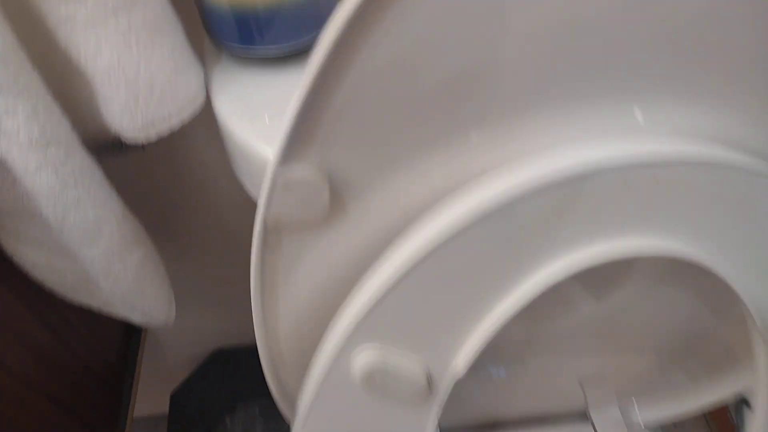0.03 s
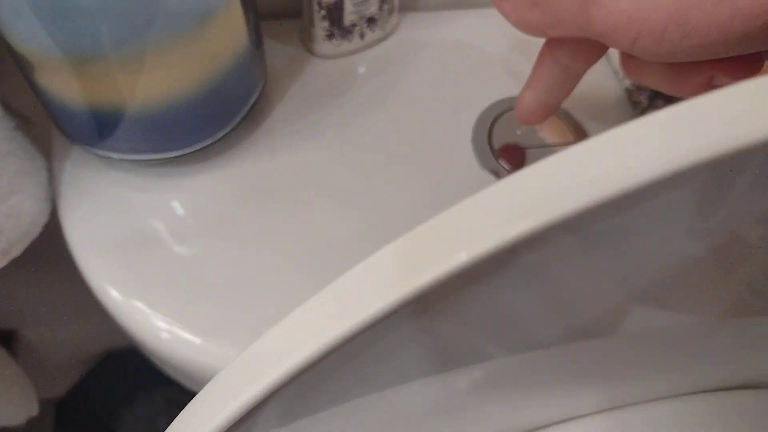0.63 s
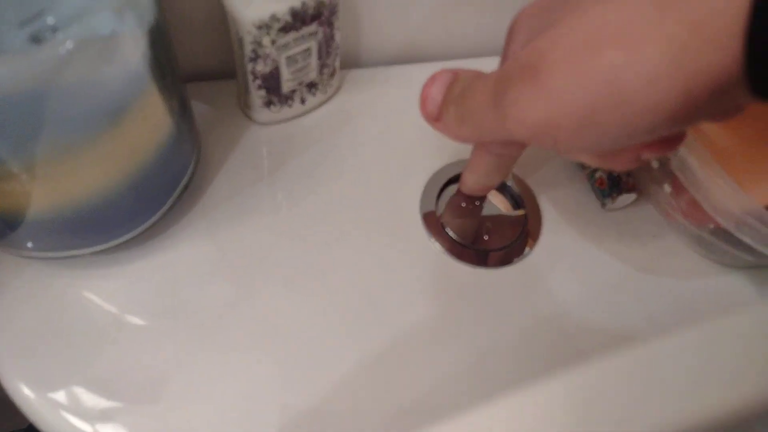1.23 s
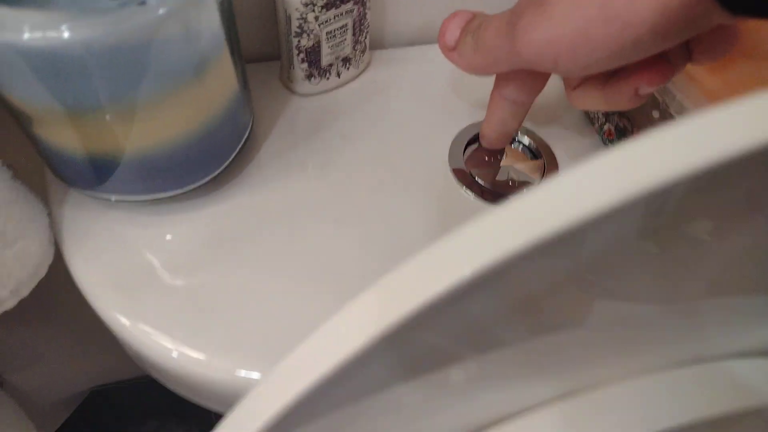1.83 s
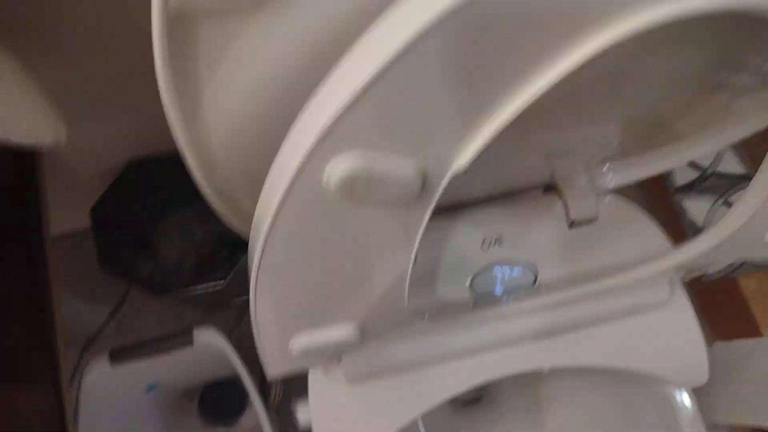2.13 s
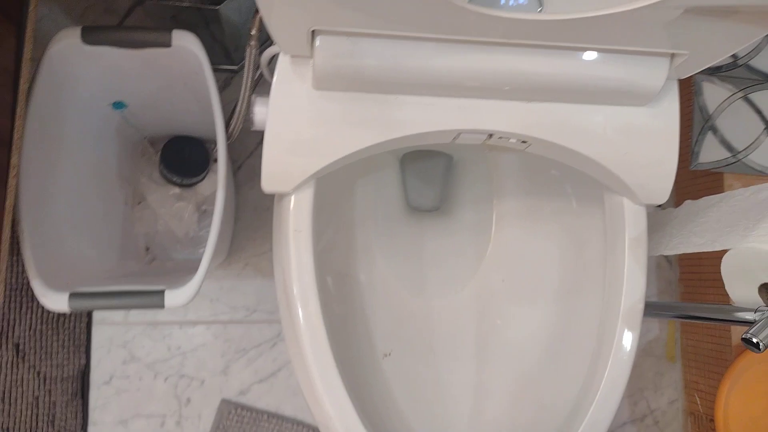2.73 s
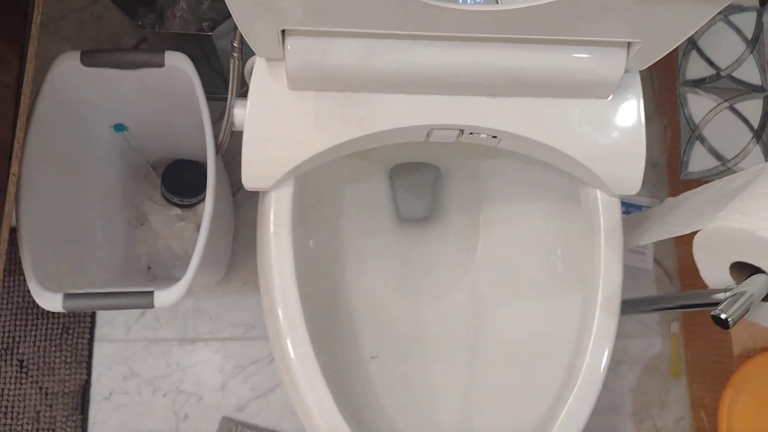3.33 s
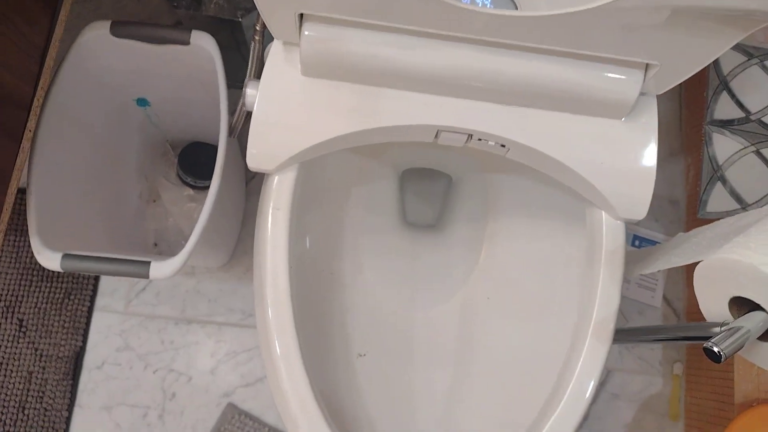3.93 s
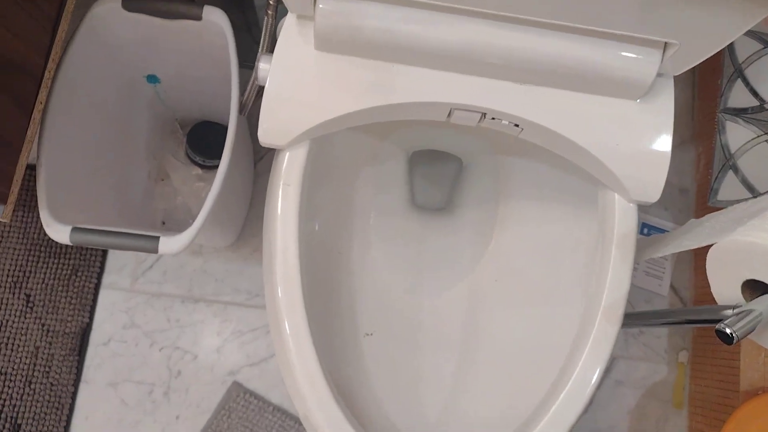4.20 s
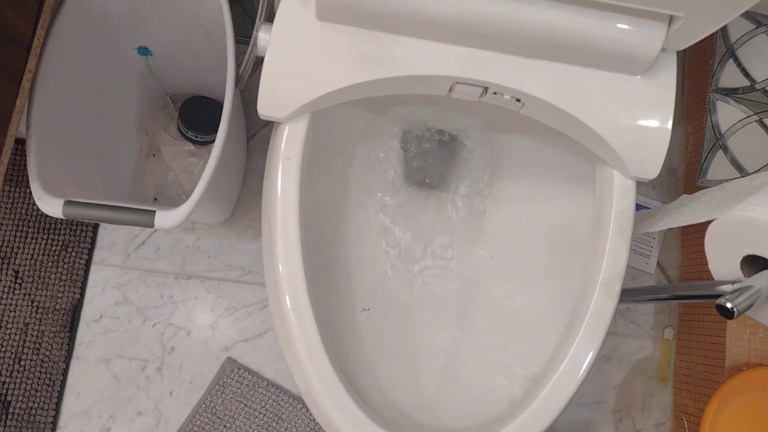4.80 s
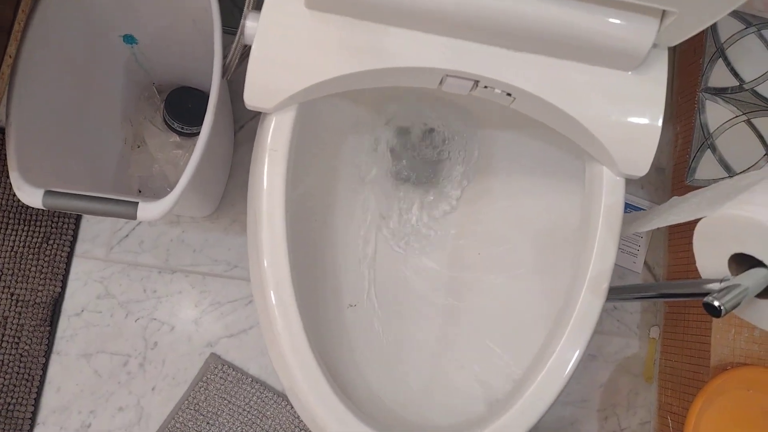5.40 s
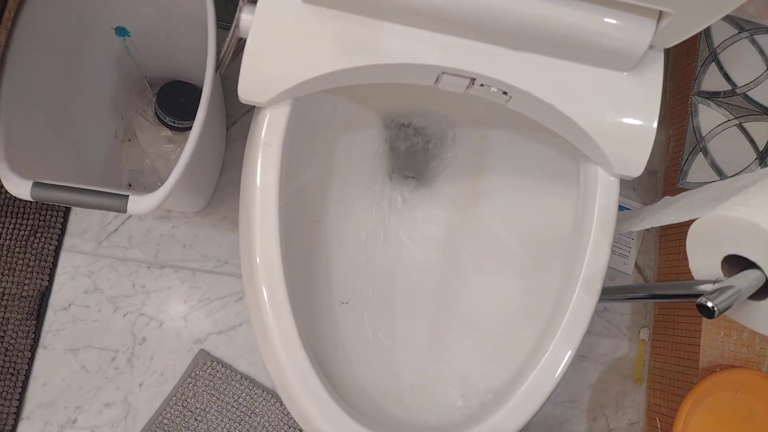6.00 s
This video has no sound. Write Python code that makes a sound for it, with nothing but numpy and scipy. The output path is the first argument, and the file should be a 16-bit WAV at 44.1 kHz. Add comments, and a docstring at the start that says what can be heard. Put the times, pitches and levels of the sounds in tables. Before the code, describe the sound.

A low, steady drone fills a small tiled bathroom. A hand rubs about softly and presses a toilet's flush button with a few faint clicks. After a quiet pause, a jet of water hisses up and the toilet flushes loudly, with deep glugs in the drain, churning bubbles and spray spattering the porcelain bowl. The microphone is close, and the tiles add a short reverberation.

```python
"""A small tiled bathroom, in which a toilet is flushed. Over the low drone of the room's standing
waves a hand rubs about and clicks the button. After a pause the jet hisses up and drives air through
the trap. Each bubble rings as an oscillator, the larger the lower: big ones glug in the trap, smaller
ones churn and plop in the bowl, and spray spatters the porcelain as the water surges again.
The air modes of the bowl and the reverberation of the tiles colour the water's sound."""
import sys
import numpy as np
from scipy import signal
from scipy.fft import rfft, irfft, next_fast_len
from scipy.io import wavfile
from scipy.ndimage import uniform_filter1d, map_coordinates

SR = 44100
rng = np.random.default_rng(int(sys.argv[2]) if len(sys.argv) > 2 else 0)


def store_pcm(level_fs):
    """Save levels as 16-bit WAV."""
    pcm = np.round(np.clip(level_fs, -1, 1) * 32767).astype(np.int16)
    wavfile.write(sys.argv[1], SR, np.atleast_2d(pcm).T)


N = 271215
FLUSH_S, TOP_HZ = 4.1, 15850  # onset of the stream; upper limit of the sound

# Noise spectra of the room and the jet. Each row: frequency in Hz, relative density in dB.
DRONE_SPECTRUM = [(15, -63), (25, -38), (38, -18), (64, -17.5), (73, -23), (86, -9.5), (136, -7),
                  (168, -5.5), (183, 1), (200, -16), (227, -4.5), (281, -5.5), (500, -22.5), (650, -40),
                  (1100, -120)]
AIR_SPECTRUM = [(240, -79), (400, -2.5), (513, -7), (568, 2.5), (738, -1.5), (835, 0.5), (1080, -5.5),
                (1540, -6), (1810, -9.5), (2160, -10), (6000, -38.5), (7800, -36), (13200, -120)]
SLEEVE_SPECTRUM = [(1760, -21), (3000, -10), (3360, -19.5), (3620, -12.5), (15100, -30), (16000, -37)]
HISS_SPECTRUM = [(210, -37), (350, 6.5), (530, 9.5), (707, 7.5), (871, 5), (943, 2), (1160, 7), (1500, 3.5),
                 (1730, 0), (2240, -10), (2420, -13), (3450, -45), (4700, -36), (6000, -15), (13400, -29),
                 (16000, -28)]
SIZZLE_SPECTRUM = [(4000, -40), (7000, -9), (10000, -4.5), (13000, 1), (15000, -6), (16000, -4)]
# Spectra of five bubble sizes, largest first. Each row: frequency in Hz, relative density in dB.
GURGLE_SPECTRUM = [(29, -63), (50, -40), (75, -14), (95, -4), (112, -7), (145, -3), (175, -4), (205, 2),
                   (245, 0), (290, -4), (308, -8), (337, 0.5), (385, -5), (420, -2), (476, -8), (600, -30),
                   (1100, -120)]
BURBLE_SPECTRUM = [(280, -60), (430, -24), (500, 4.5), (595, 3.5), (640, 6), (720, 1), (800, -7),
                   (1300, -87)]
SLOSH_SPECTRUM = [(440, -15), (800, -13), (969, 5.5), (1100, 3.5), (1300, 4.5), (1500, -11), (1740, -8),
                  (1900, -3), (2470, -34), (4180, -120)]
CHURN_SPECTRUM = [(940, -21), (1450, 3.5), (1610, 1.5), (1740, -15), (2100, -0.5), (2480, -2.5),
                  (2850, -1.5), (3210, -3), (3550, -8), (4100, -8.5), (4650, -15.5), (5500, -33),
                  (7150, -44.5), (12100, -120)]
SPRAY_SPECTRUM = [(2240, -36), (3800, -1), (4660, -6.5), (5550, -7), (6500, -4.5), (8200, -6), (10500, -11),
                  (13700, -13.5), (15200, -15), (16000, -30)]
# Modes of room, water channels and bowl. Each row: frequency in Hz, bandwidth in Hz, gain in dB.
ROOM_MODES = [(97, 5.3, -3), (173.8, 7.5, 4.5), (245.4, 8, 2.5), (289, 3.4, -14), (332.3, 4.2, 3)]
CHANNEL_MODES = [(877, 24, 3), (1150, 48, -4), (1450, 60, -3), (1590, 25, 1), (1910, 43, -1), (2250, 70, 5),
                 (2440, 29, -5), (2690, 50, -1), (3040, 51, -7), (4000, 130, -11), (5750, 43, -21),
                 (6100, 50, -20), (6300, 50, -18), (6620, 44, -16), (7540, 39, -23)]
BOWL_MODES = [(95, 7, -2), (223, 61, -0.5), (337, 24, -3), (420, 16, 3), (591, 14, 7), (636, 20, 5),
              (675, 30, 2), (953, 22, 11), (1068, 36, 3), (1298, 26, 3), (1476, 20, 13), (1609, 32, 8),
              (1820, 26, 10), (2057, 36, 11), (2170, 48, 10), (2413, 22, 13.5), (2745, 26, 7),
              (3250, 70, -3)]
# Coherence of the room tone and near the bowl. Each row: frequency in Hz, left-right correlation.
ROOM_COHERENCE = [(40, 0.54), (130, 1), (290, 0.76), (640, 0.22), (1410, 0.067), (3100, 0)]
BOWL_COHERENCE = [(40, 0.81), (110, 0.99), (270, 0.98), (400, 0.87), (750, 0.39), (1200, 0.54),
                  (2300, 0.54), (4000, -0.38), (7000, -0.38), (15000, -0.48)]
# Reverberation of the tiles. Each row: frequency in Hz, time to fall 60 dB in seconds.
TILE_DECAY = [(150, 0.44), (1000, 0.19), (4000, 0.085), (14000, 0.071)]
# Stereo balance of the toilet. Each row: frequency in Hz, left minus right in dB.
TOILET_BALANCE = [(200, -0.5), (380, -4), (700, -1), (1290, 0), (2380, 0), (4400, -1), (15000, -1)]
# Steady room tones. Each row: frequency in Hz, level by the cistern in dB, level over the bowl in dB.
HUM_TONES = [(96.9, -61, -59), (166.9, -52, -53), (285.3, -50, -62), (323.0, -58, -54.5), (565.2, -65, -68),
             (668, -66, -76), (826, -68, -72), (855.9, -66, -68), (1295, -75, -77), (1561, -71, -73)]
# The listener's path. Each row: time in seconds, position from 0 (cistern) to 1 (bowl).
LISTENER_PATH = [(0, 0.89), (0.35, 0.046), (2.1, 0), (2.6, 0.43)]
# Envelopes of drone, jet, escaping air and stream. Each row: time in seconds, relative level in dB.
DRONE_LEVELS = [(0.0, -54), (0.19, -57.5), (0.3, -52.5), (1.0, -52), (1.25, -51), (1.85, -55), (2.15, -52),
                (2.55, -59), (2.9, -55), (3.1, -56), (3.8, -57)]
JET_LEVELS = [(3.7, -98), (3.83, -53), (3.9, -53), (4.0, -44.5), (4.08, -41.5), (4.16, -38), (4.4, -41),
              (4.75, -39), (6.15, -45.5)]
SIZZLE_LEVELS = [(3.78, -75), (3.92, -71), (4.08, -57), (4.12, -52.5), (4.28, -46), (4.55, -67),
                 (4.62, -75), (4.8, -83)]
FLOW_LEVELS = [(4.1, -7), (4.25, 5), (4.5, 4.5), (4.76, -0.5), (5.0, 1), (5.3, 0.5), (5.75, 0.5), (5.94, 4),
               (6.15, 6)]
# Rubs of the hand. Each row: start and length in seconds, crest level in dB, centre and width in Hz.
HAND_SCUFFS = [(0, 0.42, -55, 654, 170), (0, 0.43, -53.5, 956, 220), (0.098, 0.24, -62, 1570, 260),
               (0.972, 0.052, -67, 8950, 7000), (0.874, 0.085, -66, 1980, 1100),
               (1.079, 0.31, -60, 1590, 1290), (1.527, 0.11, -47, 270, 199),
               (2.059, 0.11, -66.5, 3500, 5000), (2.82, 0.16, -45, 167, 22), (3.154, 0.14, -48.5, 102, 40),
               (3.246, 0.27, -54.5, 676, 1390), (3.334, 0.062, -59.5, 2500, 3200)]
# Button clicks, single surface bubbles, and spray striking porcelain.
# Each row: start in seconds, relative peak level in dB, frequency in Hz.
BUTTON_TICKS = [(0.878, -52, 2200), (0.8925, -57, 4600), (0.8935, -48.5, 2100), (0.9345, -52, 2500),
                (2.3265, -52, 3000), (2.3275, -54, 5500)]
SURFACE_PLOPS = [(3.835, -50, 2280), (3.86, -44, 3260), (3.94, -51, 2420), (4.0155, -25, 2230),
                 (4.18, -41, 4000), (4.2299, -21, 994), (4.3343, -18.5, 2240), (4.352, -19.5, 972),
                 (4.3936, -13, 2240), (4.5003, -17, 2270), (4.52, -15.5, 3000), (4.6146, -25, 1430),
                 (4.7395, -25, 2240), (4.8142, -18, 2860), (4.8271, -18, 1620), (4.832, -16, 2350),
                 (4.9802, -17, 2060), (5.0288, -11.5, 2370), (5.04, -12.5, 1450), (5.0572, -4.5, 2240),
                 (5.059, -19, 2690), (5.091, -7, 2087), (5.13, -15, 2130), (5.1704, -16, 1420),
                 (5.1932, -9.5, 2110), (5.195, -13, 3540), (5.222, -13, 1514), (5.3232, -21.5, 1600),
                 (5.4095, -20, 2430), (5.4242, -15, 2115), (5.4602, -14.5, 2245), (5.5031, -23.5, 2210),
                 (5.5189, -16.5, 1077), (5.561, -24, 1880), (5.6225, -24, 2150), (5.855, -34, 2270),
                 (5.8872, -16.5, 1246), (5.908, -11.5, 2120), (5.9596, -17, 3140), (6.0164, -15.5, 2330),
                 (6.0509, -12, 1990), (6.097, -12.5, 1037)]
SPRAY_DROPS = [(4.2734, -31.5, 7850), (4.3373, -29, 9400), (4.362, -23, 6200), (4.4508, -25, 8400),
               (4.4795, -26, 6800), (4.5595, -23, 6600), (4.63, -34.5, 7800), (4.6852, -31, 3720),
               (4.8282, -36, 6470), (4.9953, -32.5, 9700), (5.052, -23.5, 4270), (5.1257, -27.5, 7100),
               (5.2492, -40, 9600), (5.3106, -36, 8280), (5.4622, -34, 6200), (5.5246, -33, 6830),
               (5.544, -31, 11700), (5.584, -32, 6300), (5.602, -29, 10100), (5.686, -36.5, 9050),
               (5.8075, -29, 10600), (5.915, -38, 10300), (6.0737, -20.5, 5040)]
# Air pockets leaving the trap.
# Each row: start in seconds, relative level in dB, frequency in Hz, time to fall 60 dB in seconds.
AIR_POCKETS = [(4.177, -12, 252, 0.066), (4.2268, -2.5, 246, 0.054), (4.233, -8, 341.6, 0.092),
               (4.272, -8, 291, 0.085), (4.285, -20, 643, 0.097), (4.289, -11, 266, 0.091),
               (4.303, -11, 333.2, 0.23), (4.367, -25, 313, 0.13), (4.392, -15, 228, 0.097),
               (4.439, -16, 316, 0.073), (4.441, -17, 612, 0.053), (4.502, -15.5, 261, 0.12),
               (4.553, -13.5, 247, 0.08), (4.65, -15, 253, 0.083), (4.823, -14.5, 235.4, 0.098),
               (4.854, -11, 243, 0.071), (4.883, -12.5, 236, 0.07), (4.945, -30, 602, 0.098),
               (5.648, -19.5, 308, 0.068), (5.675, -19, 251, 0.17), (5.741, -16.5, 221, 0.14),
               (5.884, -14, 218, 0.075)]
# Surges of air and water.
# Each row: start, attack and length in seconds, then levels of gurgle, churn and spray in dB.
WATER_SURGES = [(4.08, 0.011, 0.14, -47, -56, -68), (4.223, 0.0016, 0.074, -25.5, -36.5, -44.5),
                (4.317, 0.012, 0.23, -36, -32.5, -41), (4.603, 0.008, 0.036, -43, -31.5, -50),
                (4.803, 0.022, 0.051, -26, -27.5, -41), (4.916, 0.094, 0.095, -33.5, -31, -43.5),
                (5.03, 0.0078, 0.11, -57, -31, -42.5), (5.174, 0.013, 0.067, -38.5, -29, -48),
                (5.258, 0.01, 0.14, -42, -53, -47), (5.405, 0.006, 0.087, -35.5, -43, -45.5),
                (5.498, 0.012, 0.097, -32, -44, -45.5), (5.634, 0.006, 0.11, -32, -47, -55),
                (5.795, 0.0045, 0.013, -53, -43.5, -44.5), (5.87, 0.018, 0.012, -45, -35, -44.5),
                (5.961, 0.053, 0.22, -55, -32.5, -42.5), (6.039, 0.052, 0.13, -52, -31.5, -36.5)]


def amp(db):
    """Amplitude ratio for a level in decibels."""
    return 10 ** (np.asarray(db) / 20)


def unit(x):
    """Normalisation to rms 1."""
    return x / np.sqrt(np.mean(x ** 2) + 1e-20)


def along(points, hz):
    """Interpolation of (Hz, value) points on a logarithmic frequency axis."""
    freqs, values = np.transpose(points)
    return np.interp(np.log(hz + 1), np.log(freqs + 1), values)


def curve(points, before=None):
    """Linear interpolation of (seconds, value) points at every sample."""
    times, values = np.transpose(points)
    return np.interp(np.arange(N) / SR, times, values, left=before)


def wobble(rate):
    """Smooth random modulation: a spline through `rate` Gaussian knots a second."""
    knots = rng.standard_normal(int(N * rate / SR) + 4)
    return map_coordinates(knots, [np.arange(N) * rate / SR])


def filtered(x, response):
    """Linear filtering: the spectrum of x is multiplied by a frequency response."""
    size = x.shape[-1]
    padded = next_fast_len(size + SR // 10, real=True)
    return irfft(rfft(x, padded) * response(np.fft.rfftfreq(padded, 1 / SR)), padded)[..., :size]


def coloured(x, spectrum):
    """Spectral shaping, normalised to rms 1."""
    return unit(filtered(x, lambda hz: amp(along(spectrum, hz))))


def resonance(f, hz, width):
    """Response at frequency f of a damped oscillator tuned to hz."""
    return 1j * f * width / (hz * hz - f * f + 1j * f * width)


def resonate(x, modes):
    """Modal superposition: x drives several oscillators, whose responses add."""
    return filtered(x, lambda f: sum(amp(db) * resonance(f, hz, width) for hz, width, db in modes))


def band(x, hz, width):
    """Two equal resonators in cascade pass a steep-sided band, normalised to rms 1."""
    return unit(filtered(x, lambda f: resonance(f, hz, width) ** 2))


def diffuse(pair, coherence=BOWL_COHERENCE):
    """A diffuse field: the ratio of independent mid and side signals sets left-right coherence."""
    def weights(hz):
        angle = np.arccos(np.clip(along(coherence, hz), -1, 1)) / 2
        return np.array([np.cos(angle), np.sin(angle)])
    mid, side = filtered(pair, weights)
    return np.array([mid + side, mid - side])


def noise(coherence=BOWL_COHERENCE):
    """White noise as a diffuse field."""
    return diffuse(rng.standard_normal((2, N)), coherence)


def bathroom(x, wet_db):
    """Reverberation: dense reflections from the tiles follow the direct sound and decay exponentially."""
    hz, t, spectra = signal.stft(rng.standard_normal((2, SR // 5)), SR, nperseg=256)
    decay = amp(-60 * t / along(TILE_DECAY, hz)[:, None])
    tail = diffuse(signal.istft(spectra * decay, SR, nperseg=256)[1])
    tail = np.pad(tail / np.linalg.norm(tail[0]), ((0, 0), (SR // 400, 0)))  # 2.5 ms late
    echo = signal.fftconvolve(np.atleast_2d(x), tail, axes=1)[:, :x.shape[-1]]
    return (x + amp(wet_db) * echo) / np.hypot(1, amp(wet_db))


def add(track, start_s, sound):
    """Superposition of a sound on a track."""
    part = track[:, max(round(start_s * SR), 0):][:, :sound.shape[-1]]
    part += sound[..., :part.shape[1]]


def room_tone():
    """Standing waves shape a drone and make the hum vary with position; air and a sleeve rustle."""
    t = np.arange(N) / SR
    drone_db, place = curve(DRONE_LEVELS), curve(LISTENER_PATH)
    rumble = amp(6) * coloured(noise(ROOM_COHERENCE), DRONE_SPECTRUM)
    standing = amp(-0.5) * unit(resonate(noise(ROOM_COHERENCE), ROOM_MODES))
    air_db = -53.5 + 0.45 * (drone_db - drone_db.mean())
    air = amp(air_db) * coloured(noise(ROOM_COHERENCE), AIR_SPECTRUM)
    hum = np.zeros(N)
    for hz, cistern_db, bowl_db in HUM_TONES:
        phase = 2 * np.pi * hz * t + 0.65 * wobble(3.846)
        hum += amp(cistern_db + place * (bowl_db - cistern_db)) * np.sin(phase)
    sleeve = amp(-71.5 + wobble(7.18)) * coloured(noise(ROOM_COHERENCE), SLEEVE_SPECTRUM)
    return amp(drone_db) * (rumble + standing) + hum + air + sleeve


def scuffs():
    """Friction noise: the moving hand makes soft rubs and dull bumps, each a swelling band."""
    out = np.zeros((2, N))
    for start, length, db, hz, width in HAND_SCUFFS:
        swell = np.sin(np.linspace(0, np.pi, int(length * SR)))
        rub = band(diffuse(rng.standard_normal((2, len(swell)))), hz, width)
        add(out, start, amp(db) * swell * rub)
    return out


def bubble(t, hz, t60, rise, attack):
    """A bubble is a damped oscillator whose pitch climbs as it nears the surface."""
    phase = 2 * np.pi * hz * t * (1 + rise * np.minimum(t / t60, 1) / 2)
    return np.sin(phase) * amp(-60 * t / t60) * (1 - np.exp(-t / attack))


def pops(rows, cycles, splinter_db, scatter_s, snap_db, snap_width, snap_t60, bowl_db, wet_db):
    """Impulsive excitation: a snap of noise, a tone ringing for `cycles` periods, five splinter tones."""
    out, t = np.zeros((2, N)), np.arange(SR // 7) / SR
    for start, db, hz in rows:
        snap = band(rng.standard_normal(len(t)), hz, snap_width * hz) * amp(snap_db - 60 * t / snap_t60)
        pop = snap + bubble(t, hz, cycles / hz, rise=0.012, attack=.5 / hz)
        for late, shift in rng.random((5, 2)):
            splinter_hz = min(hz * 2 ** (shift - .5), TOP_HZ)
            age = np.maximum(t - late * scatter_s, 0)
            splinter = bubble(age, splinter_hz, cycles / splinter_hz, rise=0.59, attack=.5 / hz)
            pop += amp(splinter_db - 20 * late) * splinter
        sound = bathroom(pop + amp(bowl_db) * resonate(pop, BOWL_MODES), wet_db)
        add(out, start, amp(db) * sound / np.abs(sound).max())
    return out


def button():
    """Light impacts of hand and button excite heavily damped clicks."""
    return amp(2) * pops(BUTTON_TICKS, cycles=14, splinter_db=-5, scatter_s=0.003,
                         snap_db=3, snap_width=0.45, snap_t60=0.008, bowl_db=-40, wet_db=0)


def plops():
    """A film snaps at the surface; its bubble rings freely and smaller ones splinter off."""
    return amp(-7) * pops(SURFACE_PLOPS, cycles=48, splinter_db=-7, scatter_s=0.014,
                          snap_db=-13, snap_width=0.5, snap_t60=0.003, bowl_db=-14, wet_db=-2.5)


def drops():
    """Impacts of spray on porcelain radiate bright, broadband spatters."""
    return amp(-1) * pops(SPRAY_DROPS, cycles=52, splinter_db=-1, scatter_s=0.013,
                          snap_db=-4.5, snap_width=1.0, snap_t60=0.028, bowl_db=-20, wet_db=3)


def jet():
    """Flow noise of water under pressure excites the channels; trapped air sizzles out as they fill."""
    hiss = amp(-1.5) * coloured(noise(), HISS_SPECTRUM)
    whistle = amp(-3) * unit(resonate(noise(), CHANNEL_MODES))
    sizzle_db = curve(SIZZLE_LEVELS, before=-120) + 3 * wobble(45)
    sizzle = amp(sizzle_db) * coloured(noise(), SIZZLE_SPECTRUM)
    jet_db = curve(JET_LEVELS, before=-120) + 1.5 * wobble(20)
    return amp(jet_db) * (hiss + whistle) + sizzle


def glugs():
    """Each air pocket resonates in the trap, bursts with a wet slap and excites the bowl's modes."""
    out, t = np.zeros((2, N)), np.arange(SR // 3) / SR
    slap_envelope = amp(-13 - 60 * t / 0.074) * (1 - np.exp(-t / 0.0023))
    for start, db, hz, t60 in AIR_POCKETS:
        boom = bubble(t, hz, t60, rise=0.039, attack=0.0036)
        slap = band(rng.standard_normal(len(t)), hz=416, width=500) * slap_envelope
        add(out, start, amp(db - 3) * (boom + slap))
    return bathroom(out + amp(-5) * resonate(out, BOWL_MODES), wet_db=-17)


def swarm(rate, low_hz, high_hz, cycles, spread_db, rise):
    """Incoherent sum of `rate` random bubbles a second, its slow changes of level evened out."""
    start = int(FLUSH_S * SR)
    count = int(rate * (N - start) / SR)
    when, pitch, strength, life, place = rng.random((count, 5)).T[:, :, None]
    hz = low_hz * (high_hz / low_hz) ** pitch
    offsets = np.arange(int(cycles / low_hz * SR))
    rings = bubble(offsets / SR, hz, cycles * (.5 + life) / hz, rise, attack=.5 / hz)
    rings = rings * hz * amp(-spread_db * np.log(np.maximum(strength, .01)))  # many faint, a few loud
    samples = (start + (when * (N - start)).astype(int) + offsets).ravel()
    gains = np.cos(2 * np.pi * place), np.sin(2 * np.pi * place)
    pair = diffuse(np.array([np.bincount(samples, (rings * gain).ravel(), N)[:N] for gain in gains]))
    power = np.abs(uniform_filter1d(np.mean(pair ** 2, 0), SR // 16))
    return pair / np.sqrt(power + np.mean(power) / 100)


def water(bubbles, spectrum, level_db, foam_db, bowl_db, wet_db, flutter_db):
    """Source and filter: bubbles and foam noise excite bowl and room, swelling with the flow."""
    source = (bubbles + amp(foam_db) * noise()) * amp(flutter_db * wobble(35))
    rung = source + amp(bowl_db) * resonate(source, BOWL_MODES)
    sound = coloured(bathroom(rung, wet_db), spectrum)
    return sound / np.std(sound[:, int(FLUSH_S * SR):]) * amp(level_db)


def water_levels():
    """Stream and surges add in power, giving the levels in dB of gurgle, slosh, churn and spray."""
    t = np.arange(N) / SR
    settle_t60, spray_lag_s = 0.31, 0.0049
    flow_db = curve(FLOW_LEVELS, before=-80)
    power = np.zeros((3, N))
    for start, attack, length, *levels_db in WATER_SURGES:
        onset = np.clip((t - start) / attack, 0, 1)
        settling = amp(-60 * np.clip((t - start - length) / settle_t60, 0, 2))
        power += (amp(levels_db)[:, None] * onset * settling) ** 2
    gurgle, churn, spray = power
    spray = np.interp(t - spray_lag_s, t, spray)  # lands just after the surge that threw it
    emptying_db = 4.5 * (t - FLUSH_S)  # slosh gains as the bowl empties
    slosh = churn * amp(-10.5 + emptying_db) ** 2
    layers = [(gurgle, -36), (slosh, -48 + emptying_db), (churn, -63), (spray, -61)]
    return [10 * np.log10(surge + amp(flow_db + steady_db) ** 2) for surge, steady_db in layers]


def flush():
    """Smaller bubbles ring higher: gurgle and burble in the trap, slosh and churn, then spray above."""
    gurgle_db, slosh_db, churn_db, spray_db = water_levels()
    burble_db = -5.5 + gurgle_db + 0.57 * (churn_db - gurgle_db)  # follows both gurgle and churn
    huge = swarm(rate=90, low_hz=160, high_hz=480, cycles=20, spread_db=1, rise=.1)
    big = swarm(rate=90, low_hz=420, high_hz=800, cycles=30, spread_db=1, rise=.1)
    middle = swarm(rate=330, low_hz=750, high_hz=1900, cycles=48, spread_db=2.5, rise=.08)
    small = swarm(rate=700, low_hz=1600, high_hz=5000, cycles=50, spread_db=3.4, rise=.08)
    fine = swarm(rate=1500, low_hz=3800, high_hz=15500, cycles=21, spread_db=4.4, rise=.1)
    gurgle = water(huge, GURGLE_SPECTRUM, gurgle_db, foam_db=10.5, bowl_db=-9, wet_db=-5.5, flutter_db=-1)
    burble = water(big, BURBLE_SPECTRUM, burble_db, foam_db=-1.5, bowl_db=-3, wet_db=-4, flutter_db=0)
    slosh = water(middle, SLOSH_SPECTRUM, slosh_db, foam_db=-2, bowl_db=-4, wet_db=-4, flutter_db=0.9)
    churn = water(small, CHURN_SPECTRUM, churn_db, foam_db=-4, bowl_db=-9, wet_db=-2, flutter_db=1.2)
    spray = water(fine, SPRAY_SPECTRUM, spray_db, foam_db=-5, bowl_db=-20, wet_db=6, flutter_db=1.7)
    return gurgle + burble + slosh + churn + spray


def scene():
    """Superposition of room, hand and toilet; a level difference sets the toilet slightly right."""
    clicks = button()
    toilet = plops() + drops() + jet() + flush() + glugs()
    toilet = filtered(toilet, lambda hz: amp(along(TOILET_BALANCE, hz) * np.array([[.5], [-.5]])))
    return room_tone() + scuffs() + clicks + toilet


def record(dry):
    """Band limiting: a third-order roll-off below 40 Hz and a sharp cut at TOP_HZ."""
    return filtered(dry, lambda hz: (hz < TOP_HZ) * hz ** 3 / np.hypot(hz ** 3, 40 ** 3))


dry = scene()
out = record(dry)
store_pcm(out)
```